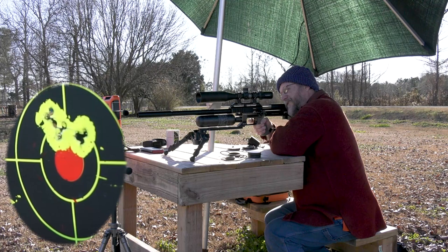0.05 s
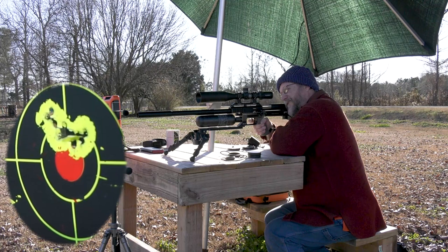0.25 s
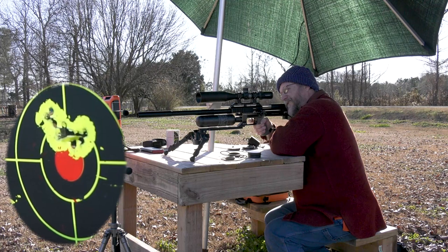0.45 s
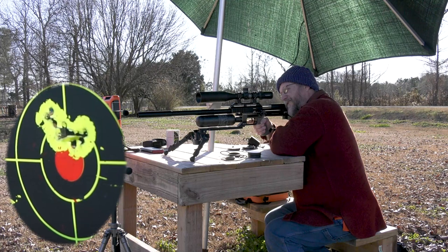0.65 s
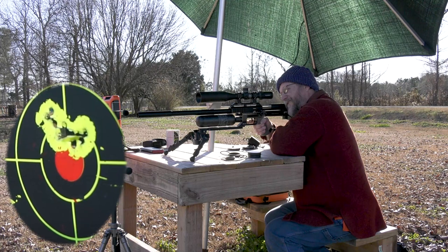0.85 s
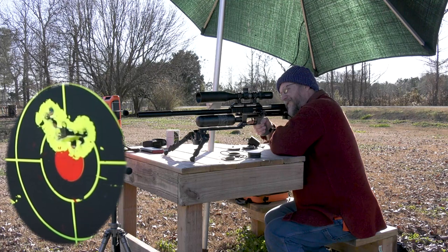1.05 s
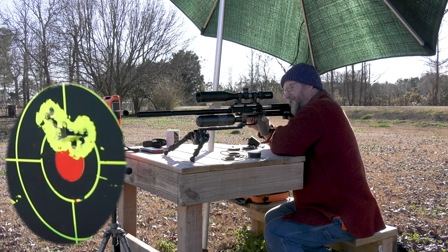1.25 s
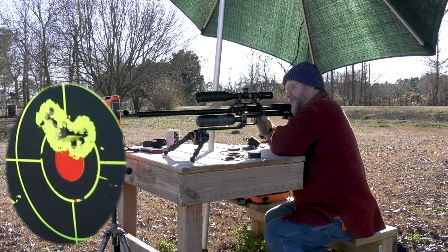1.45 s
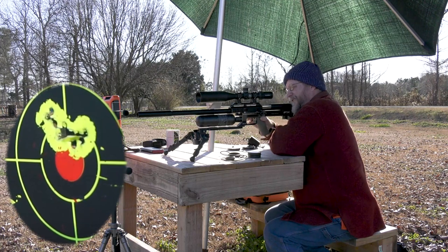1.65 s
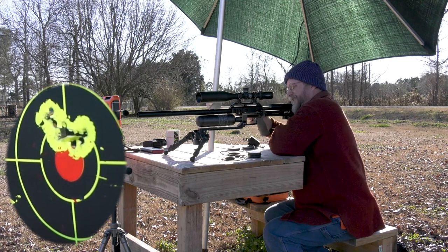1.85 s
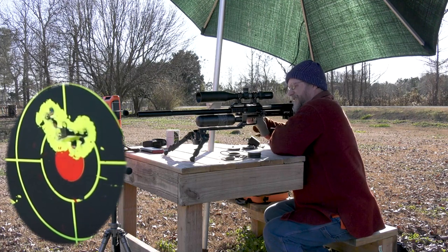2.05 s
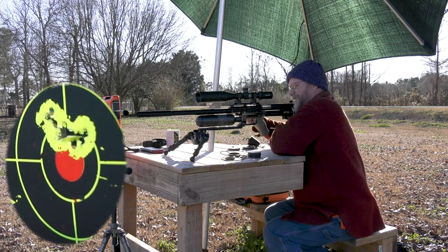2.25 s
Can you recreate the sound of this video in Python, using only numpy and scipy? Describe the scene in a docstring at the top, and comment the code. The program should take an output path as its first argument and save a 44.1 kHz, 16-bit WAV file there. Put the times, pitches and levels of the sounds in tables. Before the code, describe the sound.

A single sharp air rifle shot cracks near the microphone outdoors. After a pause come a soft hollow pop and quick steel clicks as the lever is pulled back and closed, with faint distant wind and hiss underneath.

```python
"""An open field, where an air rifle on a wooden bench fires once. Pressure pulses reflect inside the
barrel shroud and excite its modes: a bright, ringing crack, followed by short echoes. The side lever is
drawn back with a small pop from the breech cavity and a rattle of steel impacts and friction, then
snapped shut. Microphone hiss, a low wash of distant wind and a faint drone lie underneath."""
import sys
import numpy as np
from scipy import signal
from scipy.fft import rfft, irfft
from scipy.io import wavfile
from scipy.ndimage import uniform_filter1d

SR = 44100
rng = np.random.default_rng(int(sys.argv[2]) if len(sys.argv) > 2 else 0)


def log_audio(samples):
    """Write samples as a 16-bit WAV file to the path given in sys.argv[1]."""
    # one column per channel
    frames = np.atleast_2d(samples).T
    # limit to full scale, then quantise
    limited = np.clip(frames, -1, 1)
    pcm = np.round(limited * 32767).astype(np.int16)
    wavfile.write(sys.argv[1], SR, pcm)


N = 101429

# Blast pulses running back and forth in the shroud. Each row: start in seconds, level in dB,
# decay time in ms, treble tilt in dB per octave, blow on the shroud in dB.
BLAST_PULSES = [(0.2089, -34.5, 1.1, 1.7, -38), (.2109, -2.5, 0.87, 4., -8), (0.2121, -6.5, 1.36, 0.9, 0),
                (.2140, -15.5, 1.3, 0.5, -13.5), (0.2158, -8, 1.1, 1, -6), (.2185, -11.5, 1.3, -2.5, -8),
                (0.2218, -25, 1.2, 2, -25)]
CRACK_S = BLAST_PULSES[1][0]  # the strongest pulse


def shot():
    """Impulse excitation: blast pulses set the shroud's modes ringing as turbulent air escapes."""
    # Spectrum of the blast. Each row: frequency in Hz, relative density in dB.
    blast_tone = [(60, -45), (300, -19.5), (650, -40), (1200, -5), (1800, -14), (2500, 3.5), (3100, -5),
                  (4400, -12), (5800, -2.5), (6700, -3), (8200, -13.5), (9500, -11), (12500, -14),
                  (15500, -18), (16800, -44.5)]
    # Each row: frequency in Hz, relative level in dB, T60 in seconds.
    shroud_modes = [(1200, -12.5, 0.017), (2505, -7.5, 0.0094), (2760, -5, 0.011), (5770, -2, 0.013),
                    (6550, -2.5, 0.013), (7780, -21, 0.015), (10010, -13, 0.0095), (11940, -11.5, .008)]
    shroud_db, air_db, air_t60 = -11.5, -26, .045
    out, blows = np.zeros((2, N))
    for start, db, ms, tilt_db, blow_db in BLAST_PULSES:
        burst = fade(ms) * rng.standard_normal(1024)
        pulse = np.convolve(burst, minimum_phase(blast_tone, tilt_db))
        add(out, start, amp(db) * match_energy(pulse, ms))
        add(blows, start, [amp(blow_db)])
    t = np.arange(4096) / SR
    air = coloured(rng.standard_normal(len(t)), blast_tone)
    add(out, CRACK_S, amp(air_db - 60 * t / air_t60) * air)
    return out + amp(shroud_db) * signal.oaconvolve(blows, ring(shroud_modes))[:N]


def tank():
    """Free vibration: the air tank pings once, swelling for a moment before it decays."""
    # Each row: frequency in Hz, level in dB, T60 in seconds.
    tank_modes = [(985, -27, .06), (1862, -25, 0.052), (3710, -7, .043), (4807, -29, .055),
                  (14600, -36.5, .08)]
    start, rise_s = .2125, .0025
    out, ping = np.zeros(N), ring(tank_modes)
    t = np.arange(len(ping)) / SR
    add(out, start, ping * (1 - np.exp(-t / rise_s)))
    return out


def lever():
    """Impact and stick-slip friction: steel clicks and slides on steel, driving the stock's modes."""
    # Lever and magazine impacts. Each row: start in seconds, relative level in dB, centre in Hz,
    # decay time in ms, knock on the stock in dB.
    clicks = [(1.3727, -44, 7800, 1.1, -63), (1.4082, -19.5, 4730, 0.79, -52),
              (1.4110, -29, 4560, 1.1, -45), (1.4207, -32.5, 6500, 2.6, -49),
              (1.4375, -27.5, 4850, 1.6, -48.5), (1.4540, -48, 5000, 1.3, -50),
              (1.4650, -38, 5500, 1., -57), (1.4680, -26, 12000, 1., -44.5),
              (1.4730, -26.5, 9250, 1.2, -43), (1.4795, -40, 7000, .6, -69), (1.4820, -30, 6960, 1., -57),
              (1.496, -30, 7000, .8, -55), (1.499, -27, 9000, 1, -62), (1.5011, -21, 4100, 1.24, -44.5),
              (1.5040, -19, 10000, 1., -38), (1.5827, -34, 5960, 1.8, -67), (1.5910, -31.5, 9550, 1.6, -40),
              (1.6310, -44, 7000, 1., -61), (1.6600, -37, 5500, 1.1, -59), (1.6793, -35, 8000, 2., -67),
              (1.6815, -15, 6800, 1.2, -56), (1.6833, -15.5, 9800, 0.75, -40.5),
              (1.6884, -34, 7260, 2.4, -43)]
    # Each row: start and length in seconds, level in dB, relative knock on the stock in dB.
    slides = [(1.428, 0.039, -49.5, -61), (1.464, 0.033, -42, -73), (1.502, 0.026, -34.5, -41.5)]
    # Spectrum of the friction. Each row: frequency in Hz, relative density in dB.
    slide_tone = [(900, -16.5), (1900, -8), (3000, -9), (4300, -4), (5400, -9), (6500, -4), (9500, -12),
                  (12500, -18), (15500, -22), (16500, -32)]
    # Each row: frequency in Hz, level in dB, T60 in seconds.
    stock_modes = [(482, -9, 0.031), (960, -1.5, 0.024), (1235, -3.5, 0.029), (1903, -13.5, 0.071)]
    broadband_db, rattle_db, rattle_ms = -9, -20, 3.5
    slips_per_s, slip_spread_db, slip_edge = 4500, 3, 2.6
    out, knocks = np.zeros((2, N))
    for start, db, ms, hz_band, knock_db in ((s, d, m, h, k) for s, d, h, m, k in clicks):
        band = band_pass(rng.standard_normal(1024), hz_band, relative_width=.62)
        broadband = unit_rms(np.diff(rng.standard_normal(1024), prepend=0))
        noise = band + amp(broadband_db) * broadband
        rattle = amp(rattle_db) * fade(rattle_ms) * noise[::-1]
        add(out, start, .5 * amp(db) * (match_energy(fade(ms) * noise, ms) + rattle))
        add(knocks, start, [amp(knock_db)])
    t = np.arange(2048) / SR
    for start, length, db, knock_db in slides:
        chance, strength, direction = rng.random((3, len(t)))
        slip_size = amp(-slip_spread_db * np.log(strength + .019))
        slips = (chance < slips_per_s / SR) * slip_size * np.sign(direction - .5)
        stroke = np.sin(np.pi * np.clip(t / length, 0, 1) ** .46).clip(0)
        grain = fade(.23, size=64) * rng.standard_normal(64)
        scrape = signal.oaconvolve(slips, grain)[:len(t)] + slip_edge * slips
        add(out, start, amp(db) * stroke * coloured(scrape, slide_tone))
        add(knocks, start, amp(knock_db) * stroke * unit_rms(slips) / 10)
    return out + signal.oaconvolve(knocks, ring(stock_modes))[:N]


def latch():
    """Superposition: the ringing of three quick blows adds up as the latch snaps home."""
    # Each row: frequency in Hz, level in dB, T60 in seconds.
    latch_modes = [(2430, -41.5, 0.017), (3830, -30.5, 0.011), (4380, -38.5, 0.044), (4450, -42, 0.027),
                   (4940, -35.5, 0.011), (7000, -41, 0.0075), (9800, -26, 0.0053), (13500, -34, .007)]
    # Each row: start in seconds, gain in dB.
    blows = [(1.6811, -0.5), (1.6818, -2), (1.684, 1)]
    out = np.zeros(N)
    for start, db in blows:
        add(out, start, amp(db) * ring(latch_modes))
    return out


def breech():
    """Cavity resonance: a pop and a puff of air excite near-odd harmonics that rise as the breech opens."""
    # Each row: multiple of the base frequency, bandwidth in Hz, gain in dB.
    cavity_modes = [(1.1, 210, 2), (3, 175, 1), (5, 260, -8)]
    base_hz, rise, rise_s = 728, .14, .032
    pop_s, pop_db, puff_db, puff_t60 = 1.2352, -17, -37, .39
    thud_s, thud_hz, thud_db, thud_t60 = 1.2545, 584, -40, .012
    out, t = np.zeros(N), np.arange(8192) / SR
    drive = amp(puff_db - 60 * t / puff_t60) * rng.standard_normal(len(t))
    drive[0] += amp(pop_db)  # the probe leaves the breech and air follows
    hz = base_hz * (1 + rise * (1 - np.exp(-t / rise_s)))
    for multiple, width, db in cavity_modes:
        add(out, pop_s, amp(db) * resonate(drive, multiple * hz, width))
    add(out, thud_s, ring([(thud_hz, thud_db, thud_t60)], size=1024))  # the lever knocks softly
    return out


def echoes():
    """Reflection and scattering: slaps from things nearby over a short diffuse return from the ground."""
    # Each row: arrival in seconds, relative level in dB, centre in Hz, decay time in ms.
    reflections = [(0.2386, -18.5, 6900, 0.85), (.2400, -29.5, 6000, 0.67), (.2447, -28, 6000, 0.98),
                   (.2520, -39, 5000, 1.1), (.2585, -38, 8000, 1.5), (0.2637, -33.5, 8000, 1.1),
                   (.2830, -42, 4500, 2.3), (.3075, -43, 1000, 1.6), (0.3142, -38.5, 1030, 1.5),
                   (0.405, -46.5, 7000, 2.1)]
    ground_db, ground_t60, ground_hz = -40.5, .2, 4993
    out, t = np.zeros((2, N)), np.arange(16384) / SR
    for start, db, hz, ms in reflections:
        band = band_pass(rng.standard_normal(1024), hz, relative_width=1.26 if hz > 2000 else .45)
        for side in out:
            add(side, start, .5 * amp(db) * match_energy(fade(ms) * band, ms))
    shared = rng.standard_normal(len(t))
    for side in out:
        diffuse = band_pass(shared + .22 * rng.standard_normal(len(t)), ground_hz, relative_width=2.5)
        add(side, CRACK_S, amp(ground_db - 60 * t / ground_t60) * diffuse)
    return out


def bench():
    """Damped vibration: recoil jolts the low modes of the bench."""
    # Each row: frequency in Hz, level in dB, T60 in seconds.
    bench_modes = [(254.2, -43, 0.028), (130, -52, 0.0533)]
    out = np.zeros(N)
    add(out, BLAST_PULSES[2][0], ring(bench_modes))
    return out


def side_scatter(near):
    """Decorrelation: a faint smeared copy, opposite in sign left and right, widens near sounds."""
    smear = fade(.5, size=128) * rng.standard_normal(128) / 3
    return amp(-56) * signal.oaconvolve(near, smear)[:N] * np.array([[1], [-1]])


def hiss():
    """Stationary noise: microphone hiss, partly coherent in the bass and incoherent in the treble."""
    # Each row: frequency in Hz, relative density in dB.
    hiss_tone = [(30, -34.5), (60, -19), (135, -17.5), (200, -7), (320, -8), (500, -8), (830, -9),
                 (1400, -11.5), (2200, -13), (5000, -13), (15000, -16), (15800, -16.5), (16100, -51)]
    # Each row: frequency in Hz, left-right correlation.
    correlations = [(60, 0.5), (150, 0.26), (380, 0.77), (950, 0.64), (2380, 0.13), (5980, 0.01),
                    (15000, -0.01)]
    correlation = curve_at(correlations, np.fft.rfftfreq(1024, 1 / SR))
    return amp(-58.5) * wash(hiss_tone, correlation, patch_db=.496)


def wind():
    """Amplitude modulation: the low noise of distant wind sinks and swells slowly."""
    # Each row: time in seconds, level in dB.
    wind_levels = [(0, -66), (.3, -66.5), (.6, -80), (1.1, -73), (1.4, -71), (1.7, -61), (1.9, -62.5),
                   (2.3, -66.5)]
    # Each row: frequency in Hz, relative density in dB.
    wind_tone = [(30, -38), (100, -10.5), (300, -1), (900, 0), (1500, -8), (3000, -9.5), (6000, -34),
                 (16000, -38.5)]
    swell = amp(np.interp(np.arange(N) / SR, *np.transpose(wind_levels)))
    return swell * wash(wind_tone, correlation=.9, patch_db=3.5)


def drone():
    """Narrow-band noise: two low, fuzzy tones heard as a faint far drone."""
    # Each row: centre in Hz, bandwidth in Hz, level in dB.
    bands = [(232, 14, -80), (328.2, 13, -73.5)]
    return sum(amp(db) * unit_rms(resonate(rng.standard_normal(N), hz, width)) for hz, width, db in bands)


def amp(db):
    """Decibels as an amplitude ratio."""
    return 10 ** (np.asarray(db) / 20)


def unit_rms(x):
    """Normalisation to a mean power of 1."""
    return x / np.sqrt(np.mean(x ** 2) + 1e-20)


def curve_at(points, hz):
    """Interpolation along a logarithmic frequency axis."""
    frequencies, values = np.transpose(points)
    return np.interp(np.log(hz + 1), np.log(frequencies + 1), values)


def add(mix, start, sound):
    """Superposition of a sound on the mix from a start in seconds."""
    part = mix[round(start * SR):][:len(sound)]
    part += sound[:len(part)]


def ring(modes, size=4096):
    """Modal decay: a struck body sounds as a sum of damped sines."""
    t = np.arange(size) / SR
    return sum(amp(db - 60 * t / t60) * np.sin(2 * np.pi * hz * t) for hz, db, t60 in modes)


def fade(ms, size=1024):
    """Exponential decay with a 0.18 ms attack."""
    t_ms = np.arange(size) / SR * 1000
    return np.minimum(t_ms / .18, 1) * np.exp(-t_ms / ms)


def match_energy(burst, ms):
    """Normalisation of a burst to the energy of its envelope."""
    return burst * np.linalg.norm(fade(ms)) / np.linalg.norm(burst)


def resonate(x, hz, width):
    """Resonance of unit gain whose centre may glide; width in Hz."""
    carrier = np.exp(2j * np.pi * np.cumsum(hz * np.ones(len(x))) / SR)
    pole = np.exp(-np.pi * width / SR)
    return 2 * (carrier * signal.lfilter([1 - pole], [1, -pole], x / carrier + 1e-18)).real


def band_pass(noise, hz, relative_width):
    """Two resonances in cascade confine noise to a band, at rms 1."""
    width = relative_width * hz
    return unit_rms(resonate(resonate(noise, hz, width), hz, width))


def coloured(noise, tone):
    """Spectral shaping of noise, at rms 1."""
    gain = amp(curve_at(tone, np.fft.rfftfreq(len(noise), 1 / SR)))
    return unit_rms(irfft(rfft(noise) * gain, len(noise)))


def minimum_phase(tone, tilt_db):
    """Minimum-phase impulse response of a spectrum, tilted above 3 kHz."""
    hz = abs(np.fft.fftfreq(2048, 1 / SR))
    octaves = np.log2(np.maximum(hz, 3000) / 5000)
    log_gain = np.log(amp(curve_at(tone, hz) + tilt_db * octaves))
    return np.fft.ifft(np.exp(np.conj(signal.hilbert(log_gain)))).real[:1024]


def wash(tone, correlation, patch_db):
    """Partial coherence: stereo noise with a shared part and faint drifting patches in its spectrum."""
    frames, hz = N // 256 + 5, np.fft.rfftfreq(1024, 1 / SR)
    left_re, left_im, own_re, own_im, patches = rng.standard_normal((frames, 513, 5)).T
    patches = unit_rms(uniform_filter1d(uniform_filter1d(patches, size=8, axis=0), size=12, axis=1))
    shared = np.clip(correlation * np.ones(513), -1, 1)[:, None]
    left = left_re + 1j * left_im
    right = shared * left + np.sqrt(1 - shared ** 2) * (own_re + 1j * own_im)
    spectra = np.array([left, right]) * amp(curve_at(tone, hz)[:, None] + patch_db * patches)
    return unit_rms(signal.istft(spectra, nperseg=1024, noverlap=768)[1][:, :N])


def low_cut(x, corner_hz=487):
    """Radiation efficiency: small parts radiate little bass."""
    return signal.sosfilt(signal.butter(3, corner_hz, "high", fs=SR, output="sos"), x)


def scene():
    """Superposition of the rifle, its echoes and the background, in stereo."""
    rifle = low_cut(shot() + tank() + lever() + latch() + breech())
    near = rifle + side_scatter(rifle) + bench()
    background = hiss() + wind()
    return near + low_cut(echoes()) + background + drone()


def record(dry):
    """Soft saturation: the input stage rounds the loudest peaks, then a low-pass limits the band."""
    ceiling, edge_hz = .93, 16700
    rounded = dry / (1 + (abs(dry) / ceiling) ** 4) ** .25
    low_pass = signal.firwin(511, edge_hz, window=("kaiser", 12), fs=SR)
    return signal.oaconvolve(rounded, low_pass[None], "same")


dry = scene()
out = record(dry)
log_audio(out)
```